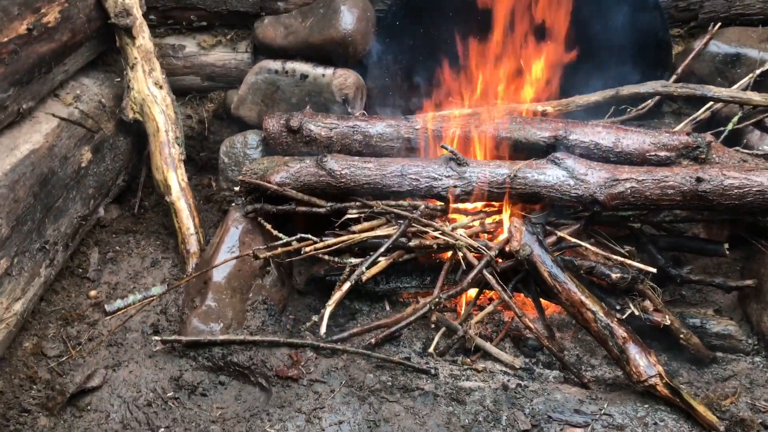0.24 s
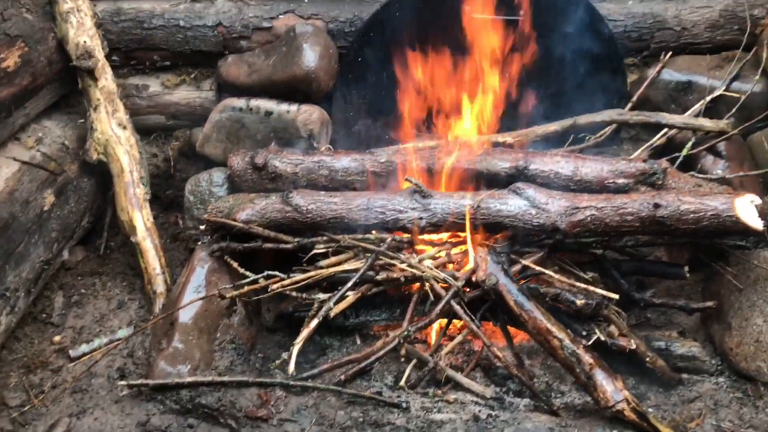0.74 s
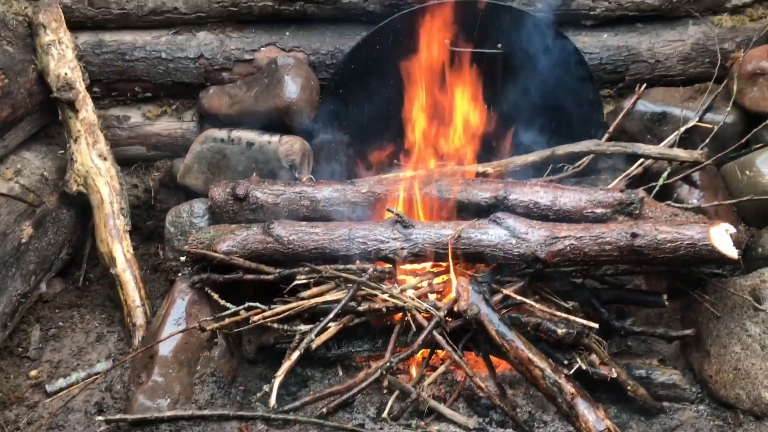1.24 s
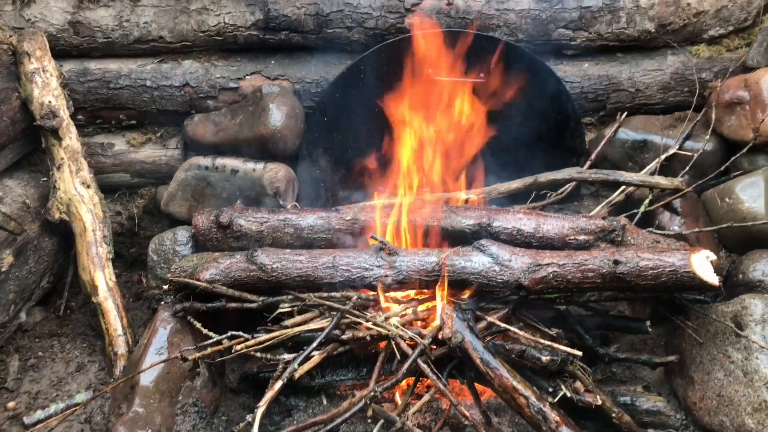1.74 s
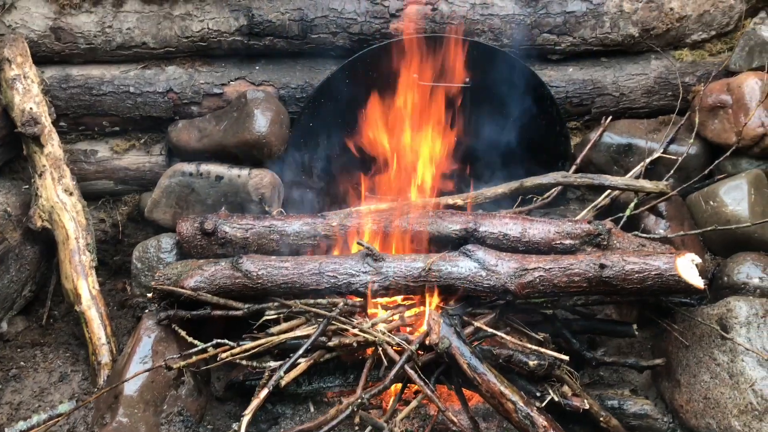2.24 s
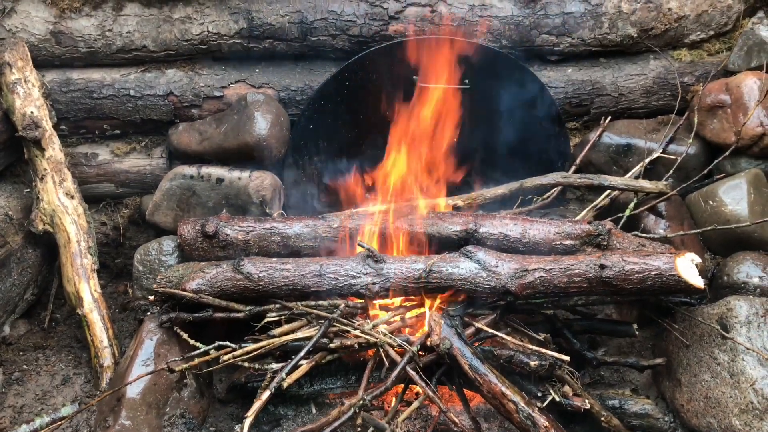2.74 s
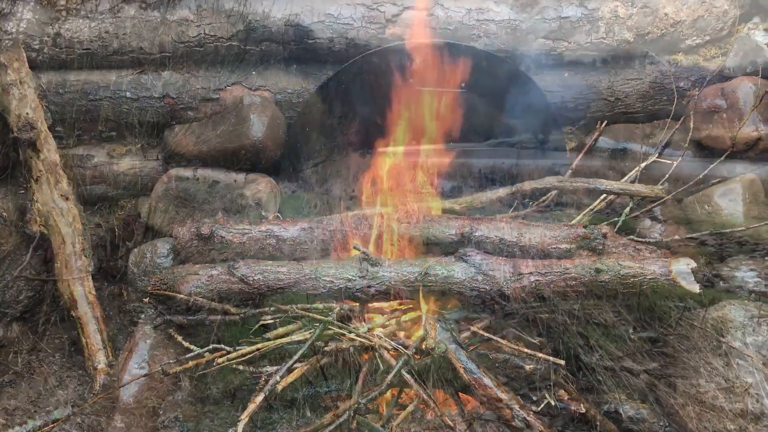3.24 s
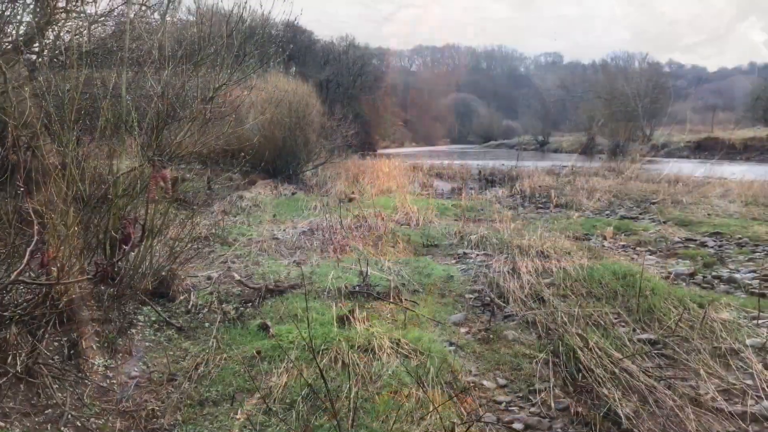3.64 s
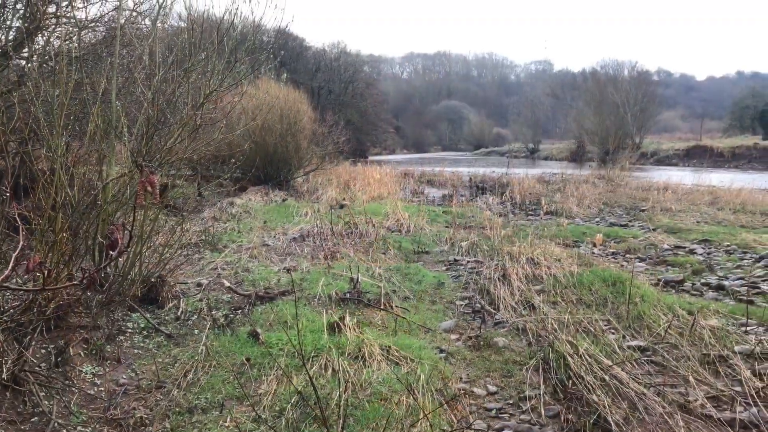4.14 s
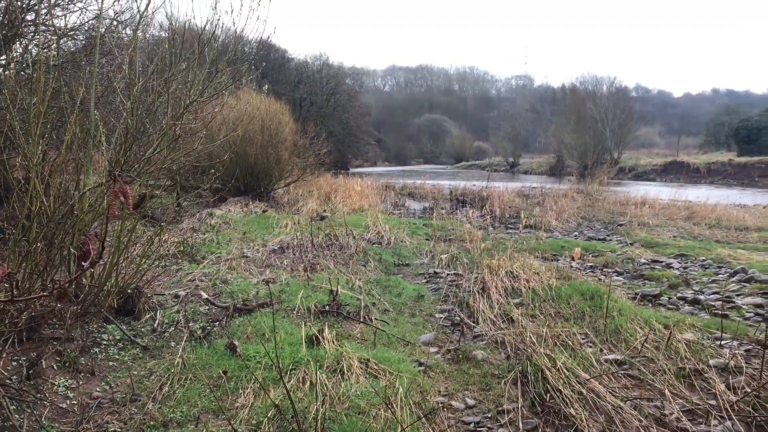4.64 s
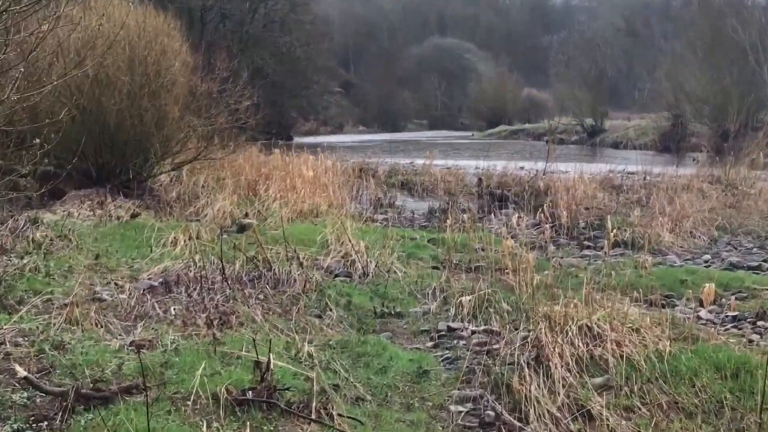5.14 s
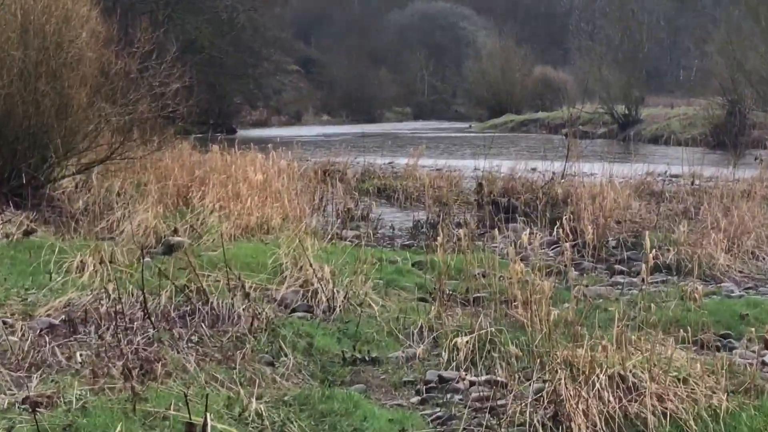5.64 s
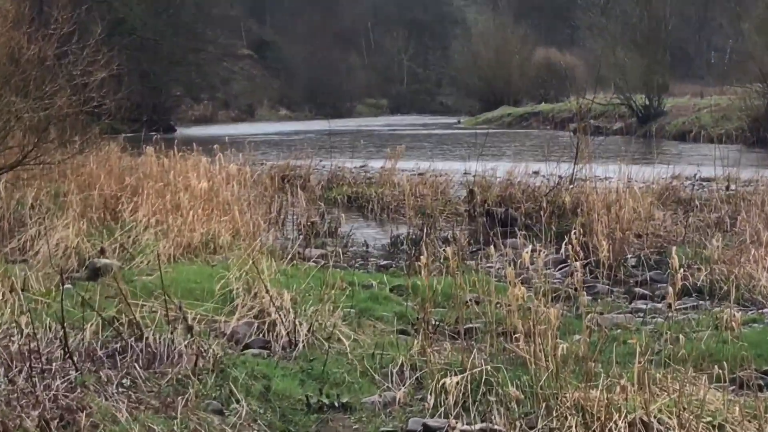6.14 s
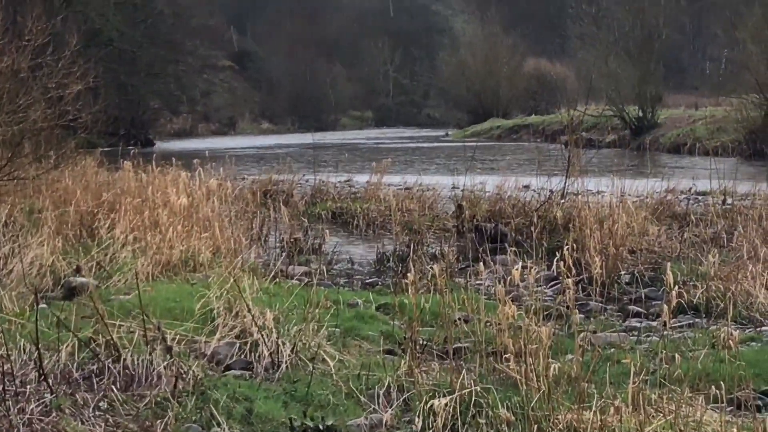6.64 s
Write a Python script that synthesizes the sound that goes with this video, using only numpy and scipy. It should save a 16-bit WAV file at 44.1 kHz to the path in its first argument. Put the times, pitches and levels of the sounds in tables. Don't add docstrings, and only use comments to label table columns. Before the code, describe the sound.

Close microphone in a log-walled rain shelter: dense irregular drops on slack cloth, bright twig snaps with short reflections off stone, small fizzing spits and dull wood knocks over low rumble. The loudest cracks come near one, two and a half, and three seconds. Then it dissolves to open air, a faint smooth rain hiss with delicate nearby ticks and brief thin chirps.

```python
import sys
import numpy as np
from scipy import signal
from scipy.fft import rfft, irfft, next_fast_len
from scipy.io import wavfile
from scipy.ndimage import uniform_filter1d

SR = 44100
rng = np.random.default_rng(int(sys.argv[2]) if len(sys.argv) > 2 else 0)


def voltage_ratio(decibels):
    exponent = np.asarray(decibels, float) / 20
    return 10 ** exponent


def inscribe(sig):
    pcm = np.round(np.clip(np.atleast_2d(sig).T, -1, 1) * 32767)
    wavfile.write(sys.argv[1], SR, pcm.astype(np.int16))


N = 304290

# time_s, level_db
CAMP_FADE = [(0, 0.5), (2.8, 0.5), (3.0, -1.5), (3.15, -0.5), (3.27, -8.5), (3.4, -7.5), (3.55, -13),
             (3.8, -10.5)]
# freq_hz, level_db (per Hz)
CAMP_RAIN_COLOUR = [(88, -41), (150, 1), (245, -15.5), (363, -11), (451, -12), (508, -11), (1230, -3),
                    (3850, -11.5), (4870, -10), (8450, -13.5), (13600, -29), (15300, -28.5), (16500, -56)]
# freq_hz, level_db (per Hz)
RUMBLE_COLOUR = [(12, -24), (20, -9), (48, 10.5), (75, 4), (128, 0.5), (231, -15), (300, -41.5), (390, -24),
                 (660, -120)]
# start_s, peak_db,
# pitch_hz
WOOD_KNOCKS = [(.0035, -38, 600), (.0055, -27.5, 3350), (0.011, -32, 1720), (.108, -24, 1400),
               (0.1158, -34, 1900), (.7209, -27.5, 1610), (.986, -20.5, 2330), (1.3495, -27.5, 3430),
               (1.8712, -39, 604), (2.0214, -33, 598), (2.104, -19.5, 1120), (2.1085, -29, 506),
               (2.3458, -27.5, 610), (2.3476, -13, 4490), (2.3956, -27, 3360), (2.4, -30, 1109),
               (2.937, -25, 1900), (3.083, -31.5, 3300), (3.2483, -18, 2320), (3.2503, -27.5, 1610),
               (3.3038, -28.5, 2870), (3.449, -28, 2370), (3.4746, -50, 600), (3.763, -46, 900)]
# start_s, peak_db, bounce_delay_ms (off the stones), bounce_db, extra_top_db (above 10 kHz)
TWIG_SNAPS = [(.0049, -23, 1.2, -7, 0), (0.01, -21, 0.73, -7, 8), (0.13, -26, 1.0, -15, 13),
              (0.2156, -19.5, 1.9, -8, 0), (.72, -21.5, 0.61, 3.5, 9), (0.787, -34, 2.1, 5, -11),
              (0.9828, -6.5, 2.5, 1.5, 7), (1.102, -30, 1, -11, -22), (1.349, -20.5, 1.8, -9.5, 22),
              (1.5054, -40, 2.3, -6, 14), (1.546, -32.5, 1.3, -16, -4), (1.6222, -21, 0.68, 4, 11),
              (1.777, -33, 0.57, 4.5, 10), (2.028, -20, 1.9, 3.5, 11), (3.0705, -44, 1.0, -15, 20),
              (2.3475, -7, 1.6, 0, 13.5), (2.4804, -35, 3, 0, 15), (2.612, -21, 1.6, -17, -17),
              (2.732, -33, 1.1, -6, -13), (2.935, -1.5, 2.2, -9.5, 9), (3.2466, -4.5, 1.24, -2, 1),
              (3.394, -32.5, 2.2, -7, 0), (3.447, -11, 0.99, 1, 7.5), (3.5385, -23.5, 1.4, -8, 7)]
# freq_hz, level_db (per Hz)
SNAP_COLOUR = [(290, -24), (500, -12), (1610, -12.5), (2160, -4), (2850, -2.5), (3820, -1), (4830, -4.5),
               (5510, 1.5), (6100, 2.5), (8930, -4.5), (12600, -19), (15100, -23), (16500, -36)]
# freq_hz, level_db (per Hz)
SHELTER_COLOUR = [(880, -42), (1500, -18), (5050, -7), (6300, 1), (9040, -0.5), (10500, -9), (13200, -18),
                  (15200, -17), (16500, -40)]
# start_s, peak_db, pitch_hz
FIRE_SPITS = [(0.0524, -48, 8230), (0.2437, -28, 6370), (0.3022, -34, 9300), (0.3273, -29, 5500),
              (0.5074, -30, 6930), (0.614, -31, 5960), (0.797, -35, 5640), (0.7894, -35, 5270),
              (0.8373, -35, 6850), (0.8743, -34, 9600), (1.108, -31, 6370), (1.1453, -40, 6550),
              (1.2066, -34, 6500), (1.256, -29.5, 5600), (1.3636, -31, 8570), (1.4067, -38, 5250),
              (1.473, -38, 7320), (1.5098, -28.5, 11000), (1.5467, -35, 7320), (1.7007, -34, 9130),
              (1.7629, -31, 7900), (1.7721, -26.5, 7300), (1.9342, -30, 4820), (1.9554, -39, 6420),
              (2.1529, -30, 4690), (2.1744, -28, 6280), (2.2602, -39, 6800), (2.469, -34.5, 7250),
              (2.5627, -30, 5080), (2.6798, -30.5, 8200), (2.7328, -26, 4820), (2.7806, -29.5, 8870),
              (2.792, -27, 2400), (2.8721, -33, 8530), (2.9073, -35, 6070), (3.3538, -44, 5250),
              (3.4881, -36, 6070), (3.5552, -43, 6500), (3.7067, -45, 6030), (3.7142, -45, 5860)]
# start_s, peak_db, tap_hz
SMALL_CLOTH_DROPS = [(0.0825, -32, 1380), (0.173, -41, 1510), (0.1963, -33, 900), (0.238, -21.5, 1000),
                     (0.31, -26, 730), (0.3228, -28, 1590), (0.5375, -24.5, 1210), (2.6196, -28, 1199),
                     (0.6272, -24, 1850), (0.704, -28, 990), (0.7817, -31, 600), (0.9136, -35, 1030),
                     (0.945, -28, 2240), (1.0179, -29, 1700), (1.0907, -43, 1380), (1.146, -35, 1080),
                     (1.2244, -25, 1420), (1.3558, -26, 950), (1.405, -26.5, 990), (1.4734, -37, 1420),
                     (1.5164, -24.5, 1110), (1.5948, -35, 1120), (1.649, -31, 860), (1.7015, -34, 1120),
                     (1.918, -32, 990), (2.0887, -30.5, 1250), (2.1215, -22, 1720), (2.1585, -23.5, 1590),
                     (2.2734, -28, 860), (2.28, -31.5, 950), (2.6755, -31, 1400), (2.337, -23.5, 1080),
                     (2.4694, -34, 780), (2.5553, -26, 1340), (2.6622, -31, 1150), (2.693, -28.5, 1120),
                     (2.733, -26, 2200), (2.6265, -30, 895), (2.6555, -30, 1500), (2.8568, -24, 860),
                     (2.9698, -30, 1720), (2.987, -33, 2330), (3.0355, -37.5, 1380), (3.093, -33, 820),
                     (3.2122, -42, 1310), (3.2187, -35, 2150), (3.2283, -32, 950), (3.354, -33, 900),
                     (3.365, -33, 1290), (3.3905, -31, 2240), (3.529, -44, 950), (3.5738, -41, 1380),
                     (3.58, -41, 690), (3.6536, -40, 1640), (3.689, -34, 2270)]
# start_s, peak_db, tap_hz
MORE_CLOTH_DROPS = [(0.0925, -31, 1480), (0.125, -27, 1260), (0.6144, -29.5, 785), (1.101, -28.5, 770),
                    (1.2183, -27, 880), (1.3404, -26, 1180), (1.4101, -28.5, 980), (1.558, -20.5, 1470),
                    (1.805, -25.5, 1480), (1.8358, -26, 910), (1.87, -30, 950), (1.918, -48, 815),
                    (1.9509, -28.5, 1080), (2.1408, -27.5, 800), (2.1746, -28.5, 900),
                    (2.1819, -28.5, 1390), (2.4591, -27.5, 1460), (2.47, -32.5, 729),
                    (2.5552, -36.5, 1350), (2.6363, -30, 824), (2.6992, -27, 1190), (2.728, -39, 1627),
                    (2.7925, -28, 770), (3.556, -39.5, 2730)]
# start_s, peak_db, tap_hz, spray_db (against the tap)
TAUT_EDGE_DROPS = [(.112, -22.5, 1290, -19), (0.2576, -18.5, 800, -17), (0.4043, -25.5, 1500, -13),
                   (.489, -26.5, 925, -6), (.5325, -24.5, 1220, -16), (0.808, -25.5, 700, -11),
                   (0.8374, -23, 990, -15), (0.8902, -25.5, 810, -17), (0.964, -24.5, 1450, -10),
                   (1.056, -28.5, 795, -27), (1.2067, -26.5, 1320, -16), (1.2954, -19, 1310, -39),
                   (1.3498, -28, 800, -3), (1.542, -22.5, 930, -10), (1.6589, -24, 1090, -15),
                   (1.9917, -27, 990, -26), (2.0472, -23.5, 2586, -16), (2.3584, -23.5, 1800, -9),
                   (2.4306, -23.5, 1150, -13), (2.501, -28, 1210, -10), (2.8077, -25, 1640, -26),
                   (2.85, -21.5, 836, -17), (2.907, -23, 1380, -21), (2.9265, -24, 1060, -21),
                   (2.9698, -30.5, 1650, -13), (3.0414, -26.5, 960, -11), (3.281, -31.5, 1420, -14),
                   (3.3466, -31.5, 1410, -25), (3.4926, -37, 860, -2), (3.6895, -45, 2270, -24)]
# start_s, peak_db, tap_hz, belly_db (swing against the tap)
SLACK_MIDDLE_DROPS = [(0.1517, -25.5, 1420, -7.5), (0.3279, -20.5, 1620, -10), (0.3653, -29.5, 2360, -12),
                      (0.4609, -26, 1190, 0.5), (0.5487, -27.5, 1380, -16), (0.796, -33, 1800, -15),
                      (0.7906, -24.5, 1310, -7.5), (0.9066, -27.5, 890, -14), (1.009, -27, 1390, -10),
                      (1.033, -25.5, 720, -13), (1.113, -29, 790, -12.5), (1.257, -24.5, 1000, -22),
                      (1.523, -25, 1090, -8.5), (2.2675, -31.5, 1030, -12.5), (1.7358, -27, 600, -1.5),
                      (1.7822, -25.5, 1920, -12), (1.8629, -25, 2840, -11), (1.9342, -30.5, 599.5, -16.5),
                      (3.093, -41.5, 810, -5), (2.1896, -30, 1510, -16.5), (2.2923, -39.5, 880, -18),
                      (2.612, -27.5, 2110, -9), (2.6486, -25.5, 1210, -14.5), (2.6803, -28.5, 620, -11),
                      (2.883, -25, 1390, -10), (3.084, -28.5, 756, -7), (3.303, -24, 870, -6.5),
                      (3.3245, -31, 940, -18), (3.619, -36, 800, -17), (3.7405, -40, 880, -21)]
# start_s, peak_db, tap_hz, spray_db, belly_db (both against the tap)
BRANCH_DRIPS = [
    (0.684, -14, 1320, -7, -36),
    (2.1031, -18, 2320, -5.5, -14),
]
# start_s, pitch_hz, level_db, decay_s
SLACK_POCKETS = [(0.45, 330, -35.5, .012), (0.55, 273, -39, 0.012), (1.4, 276, -38, 0.011),
                 (.6842, 150, -18.5, .0045), (2.1041, 300, -26.5, .009), (2.35, 148, -35, 0.011),
                 (2.682, 350, -35.5, 0.011), (1.034, 420, -36, 0.0052)]
# time_s, pitch_hz, level_db
MOTOR_STRETCHES = [
    [(1.08, 120.7, -56), (1.45, 118, -45), (1.8, 119.2, -56), (2.2, 119.5, -53), (2.62, 117.7, -43.5),
     (2.8, 117.6, -58)],
    [(3.28, 144, -49), (3.45, 139.6, -56.5), (3.62, 139, -67)],
    [(1.3, 141, -64), (1.6, 140.6, -57), (2.1, 139.7, -57.5), (2.5, 141, -59), (2.75, 137, -71)],
    [(.5, 76.6, -62), (.68, 75.2, -43), (.85, 75, -53)],
    [(1.75, 77, -45), (1.85, 75.6, -48), (1.98, 76, -42)],
]
# freq_hz, level_db (per Hz)
BANK_RAIN_COLOUR = [(15, -37), (25, 0.5), (49, 2.5), (74, -1.5), (131, -11), (232, -16), (600, -16.5),
                    (1930, -26.5), (3150, -27), (4990, -30), (5880, -30), (8370, -30.5), (10700, -39.5),
                    (15200, -43.5), (16500, -60)]
# start_s, peak_db, pitch_hz
BANK_GRASS_DROPS = [(4.077, -50, 3800), (4.1108, -44, 2230), (4.124, -44, 3680), (4.1455, -43, 8440),
                    (4.2903, -44, 7400), (4.424, -40, 3270), (4.4676, -45, 3480), (4.495, -47, 5770),
                    (4.5247, -43, 3730), (4.701, -45, 1460), (4.762, -43.5, 2490), (4.7989, -42, 8220),
                    (4.8618, -42, 1460), (4.9691, -47, 1550), (4.9753, -41.5, 4130), (5.007, -48, 4260),
                    (5.0185, -46, 5460), (5.1416, -49, 2190), (5.4147, -45, 8260), (5.773, -43.5, 3910),
                    (5.7958, -48, 5850), (6.1022, -44, 3600), (6.151, -45, 5550), (6.1745, -46, 7960),
                    (6.3062, -47, 6630), (6.3839, -47, 8480), (6.4167, -49, 2540), (6.625, -42, 4560),
                    (6.7662, -40, 2580), (6.7977, -38.5, 2290),
                    (3.8659, -50, 2370), (3.878, -48, 3100), (3.9413, -48, 5470), (4.2005, -46, 8350),
                     (4.2635, -44, 7490), (4.3892, -48, 3230), (4.5167, -47, 6290), (4.834, -46, 1850),
                     (5.8312, -50, 12000), (5.0557, -49, 6290), (5.2226, -53, 5860), (5.2366, -59, 5940),
                     (5.4345, -49, 8570), (5.4877, -48, 1810), (5.5544, -51, 2760), (5.5658, -48, 2070),
                     (5.6125, -49, 3360), (5.6226, -49, 3450), (5.694, -50, 4350), (5.8678, -43, 3450),
                     (5.9443, -50, 3700), (6.102, -43.5, 8700), (6.5471, -46, 7000), (6.1833, -49, 4220),
                     (6.213, -52, 1380), (6.3703, -50, 8230), (6.4489, -53, 5680), (6.5842, -47, 5430)]
# start_s, length_s, first_hz, last_hz, level_db
BIRD_NOTES = [(3.682, .036, 7250, 7350, -67), (3.714, .025, 7500, 7580, -66), (3.74, .058, 7100, 7090, -70),
              (4.015, .1, 7100, 7070, -68), (4.105, .078, 7050, 6980, -67), (4.198, .024, 7130, 7520, -67),
              (4.212, .075, 7500, 7500, -63), (4.295, .025, 7490, 7490, -73), (4.355, .13, 7130, 7340, -66),
              (3.735, .055, 6800, 4200, -69), (3.8, .07, 4750, 4720, -72), (3.815, .02, 4650, 4300, -72),
              (4.1, .038, 6900, 3570, -65.5), (4.14, .045, 3550, 3420, -67), (4.53, .065, 5200, 5100, -72),
              (4.565, .025, 4750, 4300, -72), (4.21, .02, 4300, 3950, -72), (4.48, .04, 3880, 3950, -73)]
# freq_hz, gain_db
MIC_RESPONSE = [(20, -32), (33, -17), (45, 0.38), (4500, -0.64), (4900, -3), (5300, -1.2), (9600, 0.2),
                (10400, -1), (15800, 4), (16050, -21), (17000, -35)]


def unit_rms(x):
    return x / np.sqrt(np.mean(x ** 2) + 1e-20)


def level_at(points, hz):
    f, value = np.transpose(points)
    return np.interp(np.log(hz + 1), np.log(f + 1), value)


def add(mix, start_s, sound):
    part = mix[max(round(start_s * SR), 0):][:len(sound)]
    part += sound[:len(part)]


def click(points, top_db=0., size=1024):
    hz = abs(np.fft.fftfreq(size, 1 / SR))
    shelf_db = top_db * np.interp(hz, [8000, 11000], [0, 1])
    log_gain = np.log(voltage_ratio(level_at(points, hz) + shelf_db))
    pulse = np.fft.ifft(np.exp(np.conj(signal.hilbert(log_gain)))).real[:size // 2]
    return pulse / abs(pulse).max()


def wash(points, size, patchy_db, flicker_db):
    hop = size // 4
    real, imag, patches = rng.standard_normal((3, size // 2 + 1, N // hop + 5))
    patches = uniform_filter1d(patches, size=8, axis=0)
    patches = unit_rms(uniform_filter1d(patches, size=10, axis=1))
    flicker = unit_rms(uniform_filter1d(rng.standard_normal(real.shape[1]), size=4))
    level_db = level_at(points, np.fft.rfftfreq(size, 1 / SR))[:, None]
    level_db = level_db + patchy_db * patches + flicker_db * flicker
    spectra = (real + 1j * imag) * voltage_ratio(level_db)
    return unit_rms(signal.istft(spectra, nperseg=size, noverlap=size - hop)[1][:N])


def drop(hz, spray_db, belly_db, rattle_db, noise, start_hz=2200, sink_s=0.00039, sag_s=0.002, turns=0.8):
    t = np.arange(len(noise)) / SR
    sweep_hz = hz * np.exp(-t / sag_s) + start_hz * np.exp(-t / sink_s)
    tap = -np.sin(2 * np.pi * np.cumsum(sweep_hz) / SR)
    tap *= np.exp(-t * hz / turns) * (1 - np.exp(-(t / 0.00019) ** 2))

    belly = -voltage_ratio(belly_db + 3.5) * np.sin(2 * np.pi * 380 * t * (1 - 30 * t))
    belly *= np.exp(-t / 0.004) * (1 - np.exp(-t / 0.0016))
    slow_belly = -voltage_ratio(belly_db - 3.5) * np.sin(2 * np.pi * 170 * t)
    slow_belly *= np.exp(-t / 0.0076) * (1 - np.exp(-t / 0.0024))

    cloth_band = signal.butter(2, [300, 3800], "band", fs=SR)
    rattle = unit_rms(signal.lfilter(*cloth_band, noise * abs(noise)))
    rattle *= voltage_ratio(rattle_db + 3.5) * np.exp(-t / 0.0096) * (1 - np.exp(-t / 0.0023))
    spray = unit_rms(np.convolve(noise, click(SNAP_COLOUR, size=256))[:len(t)])
    spray *= voltage_ratio(spray_db + 1.5) * (np.exp(-t / 0.00075) + 0.13 * np.exp(-t / 0.02))

    ring_hz = hz * voltage_ratio(1.5 * noise[0])
    ring = voltage_ratio(-19.0) * np.sin(2 * np.pi * ring_hz * t) * np.exp(-t / 0.0055)
    return tap / abs(tap).max() + ring + belly + slow_belly + rattle + spray


def patter(per_s, spread_db, low_hz, high_hz, spray_db, belly_db, clump_db, count=24):
    clumps = voltage_ratio(clump_db * unit_rms(uniform_filter1d(rng.standard_normal(N), size=900)))
    size = voltage_ratio(spread_db * np.minimum(rng.exponential(1, N), 3.5))
    size *= rng.random(N) < clumps * per_s / SR
    size *= rng.choice([-1, 1], N)
    shape = rng.integers(0, count, N)
    out = np.zeros(N)
    for k, hz in enumerate(np.geomspace(low_hz, high_hz, count)):
        one_drop = drop(hz, spray_db, belly_db, -15.0, rng.standard_normal(1500))
        out += signal.oaconvolve(size * (shape == k), one_drop)[:N]
    return unit_rms(out)


def camp_rain_and_rumble():
    rain_db, rumble_db, rumble_fade = -43.5, -44, 0.9
    t = np.arange(N) / SR
    fade_db = np.interp(t, *np.transpose(CAMP_FADE))
    gone = np.interp(t, [3.72, 3.82], [1, 0])
    rain = voltage_ratio(-4.0) * wash(CAMP_RAIN_COLOUR, size=256, patchy_db=4.0, flicker_db=0.5)
    rain += voltage_ratio(-4.5) * patter(500, 2.7, 574, 2750, -9.5, -16.5, 4.0)
    rumble = wash(RUMBLE_COLOUR, size=2048, patchy_db=1.3, flicker_db=0.5)
    return gone * (voltage_ratio(rain_db + fade_db) * rain + voltage_ratio(rumble_db + rumble_fade * fade_db) * rumble)


def wood_knocks():
    out = np.zeros(N)
    for start_s, db, hz in WOOD_KNOCKS:
        noise = rng.standard_normal(1200)
        knock = drop(hz, -30.0, -35.0, -18.5, noise, start_hz=300, sag_s=0.018, turns=0.99)
        add(out, start_s - .0004, voltage_ratio(db) * knock)
    return out


def twig_snaps():
    tail_base_db, tail_per_bounce = -25, 0.74
    hidden_db, tail_per_hidden = -23.5, 0.83
    ring_base_s, ring_per_db = .00021, .00001
    echo_s, echo_width_s, echo_share = .017, .004, .6
    out, t = np.zeros(N), np.arange(4000) / SR
    for start_s, db, delay_ms, bounce_db, top_db in TWIG_SNAPS:
        noise = rng.standard_normal(len(t))
        colour = click(SNAP_COLOUR, top_db)
        centred = t[:44] - .0005
        ring_s = max(ring_base_s + ring_per_db * min(bounce_db, 0), .00008)
        ring_hz = 7800 + 90 * top_db
        ring = np.cos(2 * np.pi * ring_hz * centred) * np.exp(-(centred / ring_s) ** 2)
        direct = 0.5 * np.roll(colour, shift=20) + np.pad(ring, (0, len(colour) - len(ring)))

        late = t - delay_ms / 1000 + 0.00014
        paths = np.exp(-abs(late) / 0.0026) * np.where(late > 0, 1, .35) * (t > .0004)
        hits = noise * abs(noise) * paths
        bounce = np.convolve(np.diff(hits) + 0.2 * hits[1:], click(SNAP_COLOUR, top_db - 10.5))

        tail_db = tail_base_db + tail_per_bounce * bounce_db + tail_per_hidden * max(hidden_db - db, 0)
        tail = unit_rms(np.convolve(noise, click(SHELTER_COLOUR, top_db - 7.0))[:len(t)])
        tail *= np.exp(-(t - .01) / 0.014) * (1 - np.exp(-t / 0.0011))
        tail *= 1 + echo_share * np.exp(-((t - echo_s) / echo_width_s) ** 2)

        add(out, start_s - .0005, voltage_ratio(db) * direct / abs(direct).max())
        add(out, start_s - .0002, voltage_ratio(db + bounce_db) * bounce / abs(bounce).max())
        add(out, start_s, voltage_ratio(db + tail_db) * tail)
    return out


def fire_spits():
    out = np.zeros(N)
    for start_s, db, hz in FIRE_SPITS:
        noise = rng.standard_normal(600)
        spit = drop(hz, -4.0, -40.5, -30.0, noise, start_hz=300, sag_s=0.016, turns=1.4)
        add(out, start_s - .0002, voltage_ratio(db - 3.0) * spit)
    return out


def small_cloth_drops():
    out = np.zeros(N)
    for start_s, db, hz in SMALL_CLOTH_DROPS:
        tap = drop(hz, -17.5, -29.5, -15.5, rng.standard_normal(1200))
        add(out, start_s - .0004, voltage_ratio(db - 3.0) * tap)
    return out


def large_cloth_drops():
    events = [(*row, -17.5, -25.5, -14.5) for row in MORE_CLOTH_DROPS]  # spray, belly, rattle dB
    events += [(*row, -15, -17) for row in TAUT_EDGE_DROPS]  # belly, rattle dB
    for start_s, db, hz, belly_db in SLACK_MIDDLE_DROPS:
        events.append((start_s, db, hz, -16, belly_db, -7.5 + 0.48 * belly_db))
    events += [(*row, -19) for row in BRANCH_DRIPS]
    out = np.zeros(N)
    for start_s, db, *colour in events:
        add(out, start_s - .0004, voltage_ratio(db) * drop(*colour, rng.standard_normal(1800)))
    for start_s, db, *_ in BRANCH_DRIPS:
        add(out, start_s - .0002, voltage_ratio(db - 9.0) * click(SNAP_COLOUR, 0.0))
    return out


def slack_pockets():
    stretch, slacken_s = 1.2, .002
    out, t = np.zeros(N), np.arange(3000) / SR
    for start_s, hz, db, decay_s in SLACK_POCKETS:
        turns = hz * (t + stretch * slacken_s * (1 - np.exp(-t / slacken_s)))
        swing = -np.sin(2 * np.pi * turns) * np.exp(-t / decay_s) * (1 - np.exp(-t / .0005))
        add(out, start_s, voltage_ratio(db) * swing)
    return out


def gliding_tone(rows, ramp):
    s, hz, db = np.transpose(rows)
    t = np.arange(s[0], s[-1], 1 / SR)
    tone = np.sin(2 * np.pi * np.cumsum(np.interp(t, s, hz)) / SR)
    tone *= signal.windows.tukey(len(t), ramp)
    return s[0], np.sqrt(2) * voltage_ratio(np.interp(t, s, db)) * tone


def far_motor():
    out = np.zeros(N)
    for rows in MOTOR_STRETCHES:
        add(out, *gliding_tone(rows, 0.09))
    return out


def bank_rain():
    rain = wash(BANK_RAIN_COLOUR, size=1024, patchy_db=0.03, flicker_db=0.9)
    rain += voltage_ratio(-15.0) * patter(300, 2.7, 1020, 7000, 0.5, -37.0, 2.5)
    return voltage_ratio(-53) * rain * np.interp(np.arange(N) / SR, [3, 3.75], [0, 1])


def bird_note(start_s, length_s, first_hz, last_hz, db):
    flutter_db, flutter_hz, waver_hz = 3, 43, 25
    share = np.linspace(0, 1, 24)
    s = start_s + share * length_s
    tremble = np.sin(2 * np.pi * flutter_hz * s) * np.cos(2 * np.pi * flutter_hz * s / np.e)
    swell_db = np.interp(share, [0, .6, 1], [-3, 0, -4])
    hz = first_hz + share * (last_hz - first_hz) + waver_hz * tremble[::-1]
    return gliding_tone(np.transpose([s, hz, db + swell_db + flutter_db * tremble]), .3)


def birds():
    out = np.zeros(N)
    for row in BIRD_NOTES:
        add(out, *bird_note(*row))
    return out


def bank_drops():
    out = np.zeros(N)
    tick = click(SNAP_COLOUR, -4.0, size=256)
    for start_s, db, hz in BANK_GRASS_DROPS:
        noise = rng.standard_normal(600)
        tap = drop(hz, -9.5, -34.0, -23.0, noise, start_hz=300, sag_s=0.016, turns=1.4)
        add(out, start_s - .0002, voltage_ratio(db - 1.0) * tap)
        add(out, start_s - .0001, voltage_ratio(db - 16.0) * tick)
    return out


def scene():
    fire = wood_knocks() + twig_snaps() + fire_spits()
    tarp = small_cloth_drops() + large_cloth_drops() + slack_pockets()
    camp = camp_rain_and_rumble() + fire + tarp + far_motor()
    bank = bank_rain() + birds() + bank_drops()
    return (camp + bank)[None]


def low_pass(x):
    return signal.sosfilt(signal.butter(12, 17000, fs=SR, output="sos"), x)


def record(dry):
    size = next_fast_len(N + 4096)
    mic_gain = voltage_ratio(level_at(MIC_RESPONSE, np.fft.rfftfreq(size, 1 / SR)))
    coloured = irfft(rfft(dry, size) * mic_gain, size)[:, :N]
    return low_pass(coloured)


dry = scene()
out = record(dry)
inscribe(out)
```